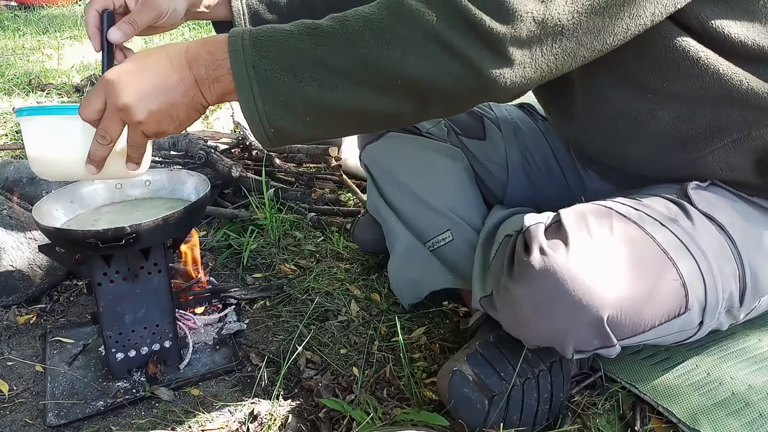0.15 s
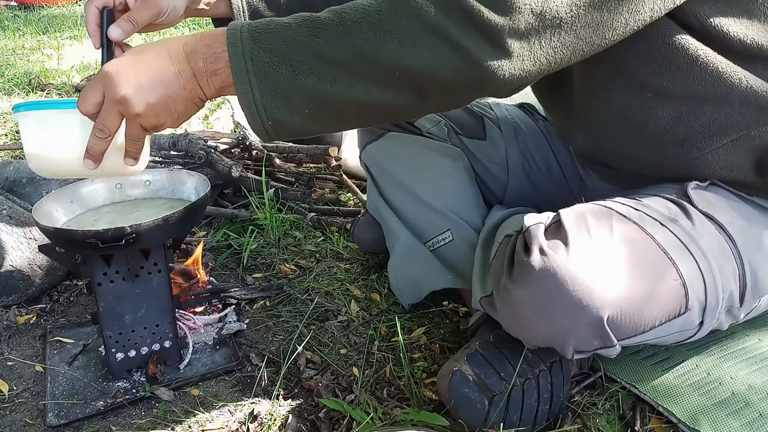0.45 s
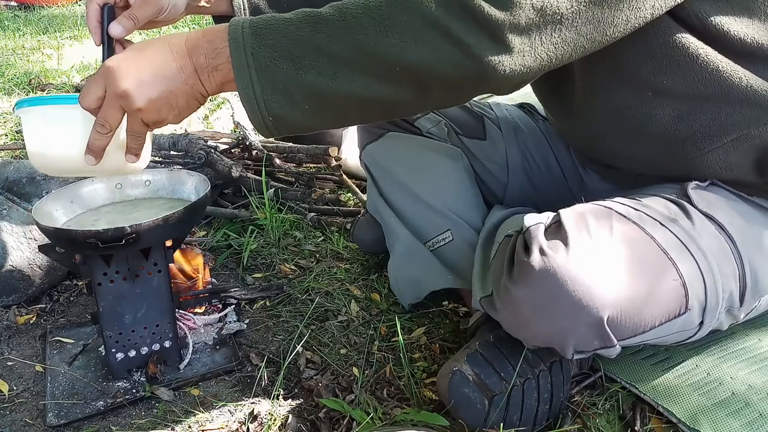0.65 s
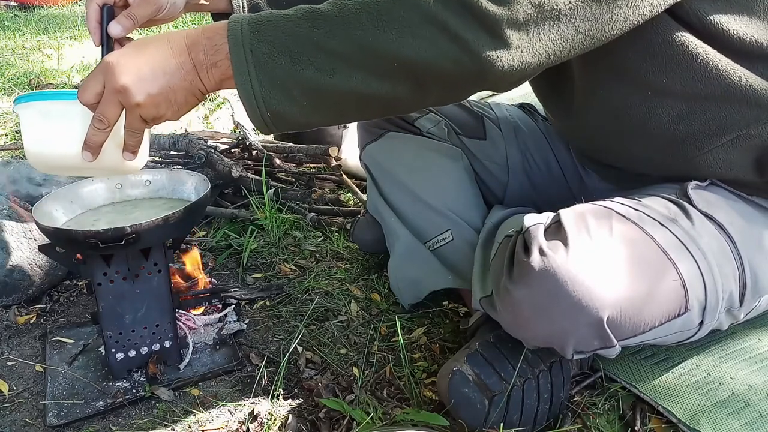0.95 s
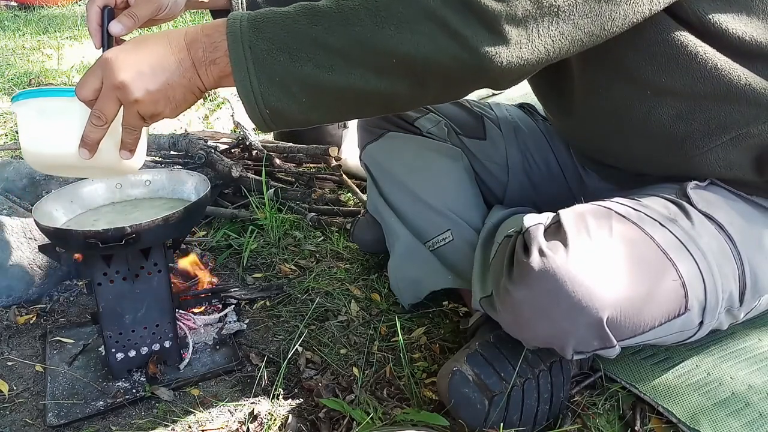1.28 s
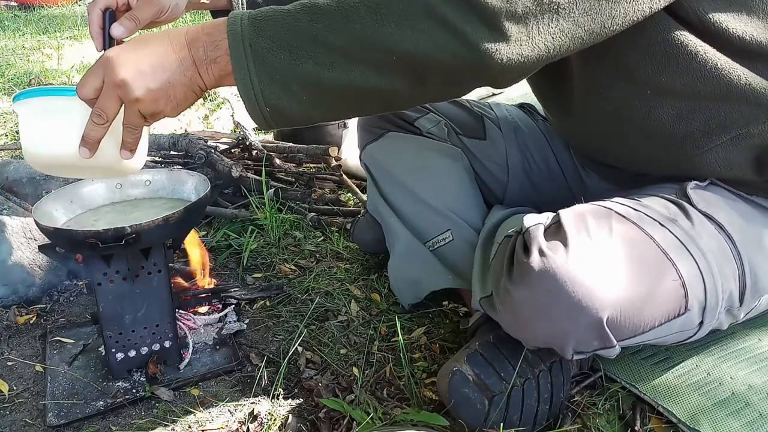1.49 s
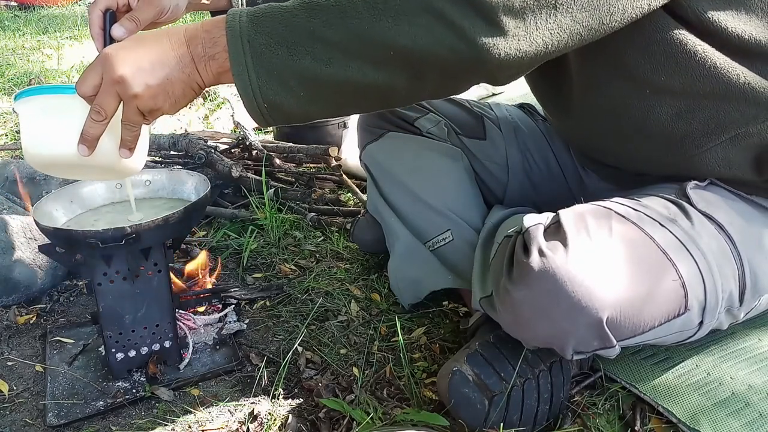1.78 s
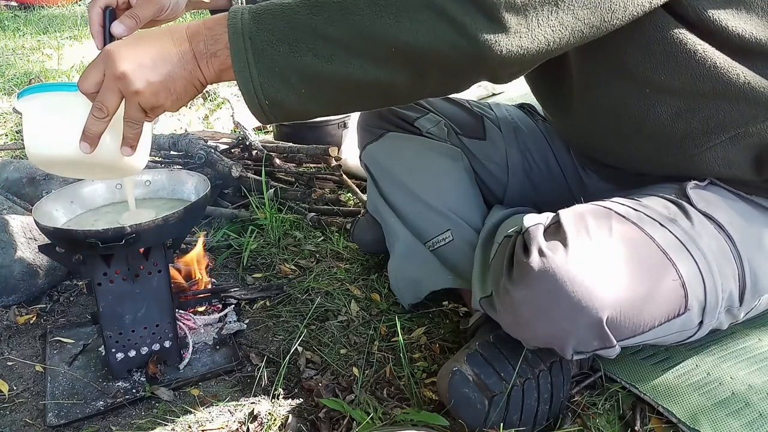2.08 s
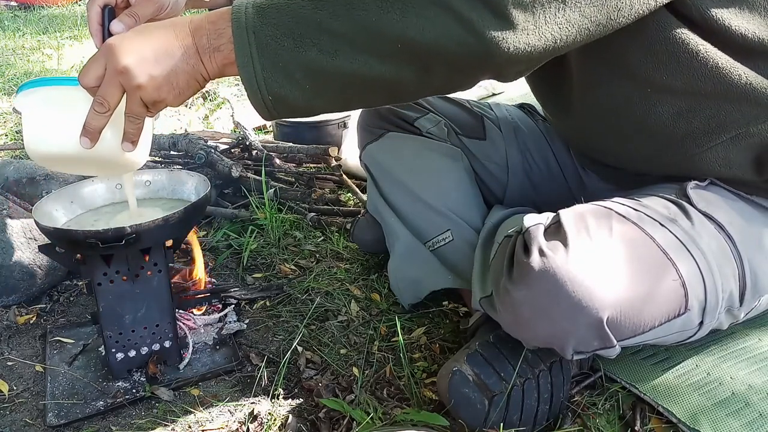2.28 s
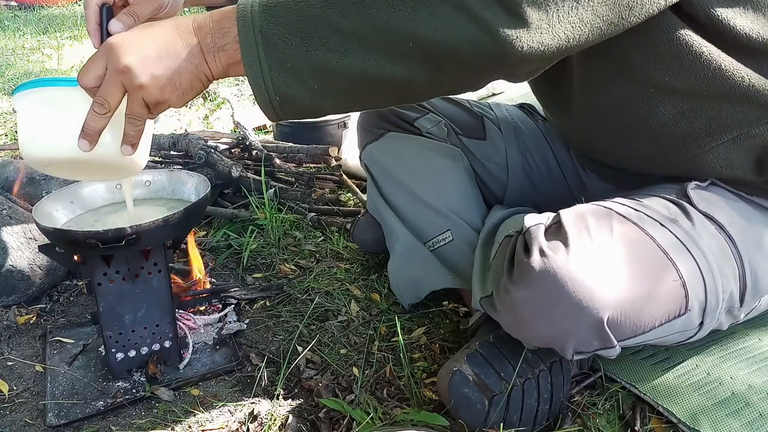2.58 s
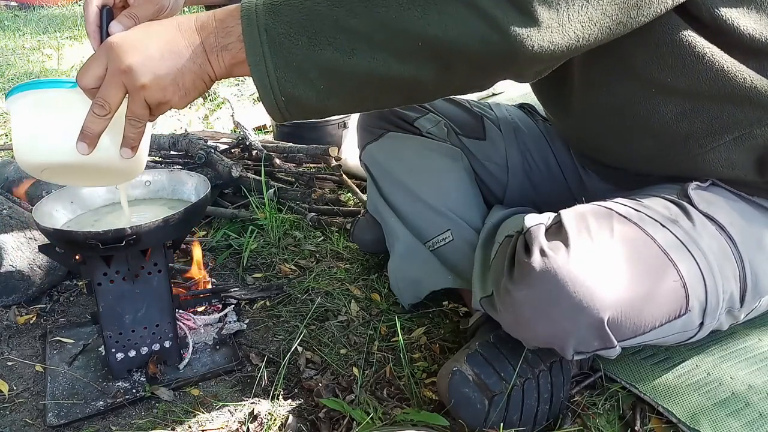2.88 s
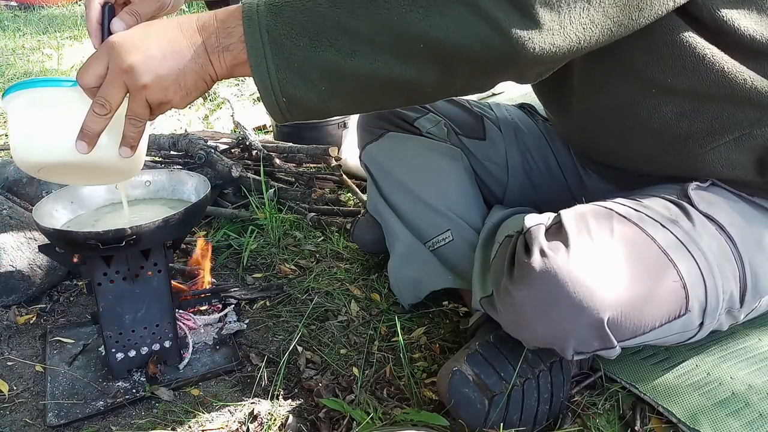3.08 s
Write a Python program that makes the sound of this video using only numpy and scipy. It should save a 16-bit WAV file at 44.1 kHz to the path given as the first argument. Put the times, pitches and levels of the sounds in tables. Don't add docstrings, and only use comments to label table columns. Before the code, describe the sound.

Batter sizzling in a hot pan, outdoors, close and slightly left in stereo. Soft leafy air and a faint low drone open alone. Firewood snaps loudly and brightly at 0.55 s, then duller and softer at 0.69 s, with brief echoes. At 1.82 s a short steam puff starts the frying; dense, steady crackling from 2.0 s drops after 2.9 s into thin sizzle and quick spits until about 3.25 s.

```python
import sys
import numpy as np
from scipy import signal
from scipy.fft import rfft, irfft, next_fast_len
from scipy.io import wavfile
from scipy.ndimage import uniform_filter1d, map_coordinates

SR = 44100
rng = np.random.default_rng(int(sys.argv[2]) if len(sys.argv) > 2 else 0)


def amplitude_ratio(level_db):
    exponent = np.asarray(level_db, float) / 20
    return 10 ** exponent


def wav_record(signal):
    frames = np.transpose(np.atleast_2d(signal))
    bounded = np.clip(frames, -1, 1)
    quanta = np.round(bounded * 32767).astype(np.int16)
    wavfile.write(sys.argv[1], SR, quanta)


N = 143325
TIME = np.arange(N) / SR
LAG_S = .000195
TOP_HZ = 15740


def unit(x):
    return x / np.sqrt(np.mean(x ** 2) + 1e-20)


def along(points, hz):
    f, v = np.transpose(points)
    return np.interp(np.log(hz + 1), np.log(f + 1), v)


def curves(rows):
    s, *cols = np.transpose(rows)
    return [np.interp(TIME, s, c) for c in cols]


def wobble(rate):
    knots = rng.standard_normal(int(N * rate / SR) + 4)
    return map_coordinates(knots, [np.arange(N) * rate / SR])


def blue_noise(count):
    return np.diff(rng.standard_normal(count + 1))


def filtered(x, response):
    m = 2 * next_fast_len(N // 2 + SR // 4)
    return irfft(rfft(x, m) * response(np.fft.rfftfreq(m, 1 / SR)), m)[..., :N]


def causal(db):
    c = irfft(np.log(amplitude_ratio(db)))
    half = c.shape[-1] // 2
    c = np.concatenate([c[..., :1], 2 * c[..., 1:half], 0 * c[..., half:]], axis=-1)
    return np.exp(rfft(c))


def from_left(x, left_db):
    def response(hz):
        left = amplitude_ratio(left_db / 2) + 0j * hz
        right = amplitude_ratio(-left_db / 2) * np.exp(-2j * np.pi * hz * LAG_S)
        return np.array([left, right])
    return filtered(x, response)


def scattered(x, t60):
    t = np.arange(SR // 4) / SR
    tail = rng.standard_normal((2, len(t))) * amplitude_ratio(-60 * t / t60)
    tail = tail / np.linalg.norm(tail, axis=1, keepdims=True)
    return signal.fftconvolve(x, tail, axes=1)[:, :N]


def air():
    # (time [s], level [dB])
    air_levels = [(0, -46.5), (.5, -46), (.7, -47), (.8, -49), (1.1, -51.5), (1.65, -51.5), (1.8, -48.5),
                  (2.1, -47.5), (2.6, -45.5), (2.8, -44.5), (3.25, -46.5)]
    # (frequency [Hz], level [dB per Hz])
    air_spectrum = [(30, -16), (110, -4.5), (230, -2), (550, 0.5), (850, -6), (2200, -9), (4000, -15.5),
                    (16000, -26)]
    # (frequency [Hz], left-right likeness [0-1])
    coherence = [(60, 0.83), (200, 1), (400, 0.75), (700, 0.31), (1400, 0.57), (3000, 0.26), (7000, 0.023)]
    patchy_db, sway_db = 1.15, -0.34
    drone_hz, drone_width_hz, drone_db = 67.8, 10, -16.5
    lag_s = .00046

    spectra = signal.stft(rng.standard_normal((2, N)), nperseg=512)[2]
    patches = rng.standard_normal(spectra.shape[1:])
    patches = uniform_filter1d(uniform_filter1d(patches, size=5, axis=0), size=10, axis=1)
    pair = signal.istft(spectra * amplitude_ratio(patchy_db * unit(patches)), nperseg=512)[1][:, :N]

    def mid_and_side(hz):
        angle = np.arccos(np.clip(along(coherence, hz), -1, 1)) / 2
        return amplitude_ratio(along(air_spectrum, hz)) * [np.cos(angle), np.sin(angle)]

    mid, side = filtered(pair, mid_and_side)
    leaves = unit(np.array([np.roll(mid + side, round(lag_s * SR)), mid - side]))
    drone = filtered(rng.standard_normal(N), lambda hz: np.exp(-((hz - drone_hz) / drone_width_hz) ** 2))
    level_db, = curves(air_levels)
    return amplitude_ratio(level_db + sway_db * wobble(3.75)) * (leaves + amplitude_ratio(drone_db) * unit(drone))


def splinter(dull, crack_db):
    # (frequency [Hz], level [dB], decay time T60 [s])
    modes = [(1210, -19, 0.0056), (1970, -10, 0.0053), (3440, -7, 0.0051), (5160, 1, 0.0033),
             (6530, -6.5, 0.0044), (7550, -5.5, 0.0064), (12600, -9, 0.0071)]
    dull_db_per_oct, rise_s, crack_t60_s = 6, .00011, .014
    t = np.arange(SR // 20) / SR
    ring = 0
    for hz, mode_db, t60 in modes:
        tilt_db = dull * dull_db_per_oct * np.log2(hz / 5000)
        ring = ring + amplitude_ratio(mode_db - tilt_db - 60 * t / t60) * np.sin(2 * np.pi * hz * t)
    crack = amplitude_ratio(crack_db - 60 * t / crack_t60_s) * blue_noise(len(t))
    return (ring + crack) * (1 - np.exp(-t / rise_s))


def snaps():
    # (time [s], peak level [dB], dullness [0-1], crack level [dB])
    snap_events = [
        (.55358, -2.5, .05, -13),
        (.68655, -8, .6, -9),
    ]
    left_db = 2
    ground_s, ground_db = .0056, -19
    bush_db, bush_t60_s, trees_db, trees_t60_s = -7, .035, -11, .2
    front_s = .0002
    out = np.zeros((2, N))
    for s, db, dull, crack_db in snap_events:
        sound = splinter(dull, crack_db)
        snap = np.zeros(N)
        snap[round(s * SR):][:len(sound)] = amplitude_ratio(db) * sound
        direct = from_left(snap, left_db)
        out += direct + amplitude_ratio(ground_db) * np.roll(direct, round(ground_s * SR), axis=1)
        front = snap[None] * np.exp(-np.clip(TIME - s, 0, 1) / front_s)
        bushes = amplitude_ratio(bush_db) * scattered(front, bush_t60_s)
        trees = amplitude_ratio(trees_db) * scattered(front, trees_t60_s)
        out += filtered(bushes + trees, lambda hz: hz < TOP_HZ)
    return out


def first_drop():
    # (frequency [Hz], level [dB])
    steam_spectrum = [(600, -24), (1500, -12), (2500, 5), (4000, -2), (7000, 1), (9000, -22), (16000, -24)]
    start_s, rise_s, length_s = 1.8185, 0.0025, 0.021
    peak_db, fade_db_per_s = -39.5, 203
    since = np.clip(TIME - start_s, 0, 1)
    gate = np.minimum(since / rise_s, 1) * (since < length_s)
    steam = unit(filtered(rng.standard_normal(N), lambda hz: amplitude_ratio(along(steam_spectrum, hz))))
    return gate * amplitude_ratio(peak_db - fade_db_per_s * since + 1.2 * wobble(300)) * steam


def single_spits():
    # (time [s], peak level [dB])
    spit_events = [(1.895, -41), (2.109, -29), (3.018, -29), (3.085, -37), (3.109, -35), (3.127, -38),
                   (3.139, -38), (3.149, -28), (3.17, -32), (3.18, -27), (3.199, -30), (3.206, -27),
                   (3.241, -39)]
    decay_s, offset_db = .004, -4
    envelope = 0
    for s, db in spit_events:
        envelope = envelope + amplitude_ratio(db + offset_db - 20 * np.clip(TIME - s, 0, 1) / decay_s) * (TIME >= s)
    return envelope * blue_noise(N)


def pops(density, count=32000):
    # (time [s], change of lag [s])
    lag_drift = [(0, 0), (2.7, 0), (2.95, -.00004), (3.25, -.00005)]
    pop_hz, spread_oct, cycles, size_db = 5520, 1.134, 1, 2
    lag_scatter_s = .00002
    u, z = rng.random((count, 2)), rng.standard_normal((count, 2))
    total = np.cumsum(density) / SR
    k = np.arange(count) + u[:, 0]
    start = np.interp(k, total, np.arange(N))
    hz = np.clip(pop_hz * 2 ** (spread_oct * z[:, 0]), 600, 17000)[:, None]
    size = amplitude_ratio(-size_db * np.log(u[:, 1] + 0.00077)) * (k < total[-1])
    size = size * np.sqrt(hz[:, 0] / pop_hz)
    right_lag = LAG_S + np.interp(start / SR, *np.transpose(lag_drift)) + lag_scatter_s * z[:, 1]
    out = []
    for lag in (0, right_lag):
        at = start + lag * SR
        i = np.ceil(at).astype(int)[:, None] + np.arange(64)
        t = (i - at[:, None]) / SR
        burst = size[:, None] * np.sin(2 * np.pi * hz * t) * np.exp(-hz * t / cycles)
        out.append(np.bincount(i.ravel(), burst.ravel(), N + SR)[:N])
    return np.array(out) / np.sqrt(density + 1)


def bubbling_fat():
    # (time [s], level [dB], pop rate [thousands per s], large bubbles [dB])
    fry_course = [(1.817, -66, 20.6, 0), (1.822, -30.5, 18.4, -9), (1.86, -47, 19.1, 5.5),
                  (1.92, -42, 19.3, 0), (2.0, -35.5, 25, 1), (2.1, -36, 25.4, 0), (2.4, -36, 25, -1),
                  (2.52, -37.5, 22, -3.5), (2.8, -36.5, 21.4, -6), (2.9, -42, 16, -12),
                  (2.925, -37, 15.8, -6), (2.95, -40.5, 11.9, -7), (3.04, -46, 7.6, 0),
                  (3.25, -49, 6.2, -3)]
    # (frequency [Hz], level [dB])
    fry_spectrum = [(150, -33.5), (500, -1.5), (950, 0.5), (2000, 0.5), (4000, 0), (7000, 3), (11000, 8.5),
                    (16000, 17)]
    clump_db, swell_db, large_below_hz = 1.2, .3, 2200
    level_db, thousands, large_db = curves(fry_course)
    on = TIME >= fry_course[0][0]
    crackle = pops(on * np.clip(thousands, .3, 30) * 1000)
    crackle = crackle / np.std(crackle[:, on])
    crackle = filtered(crackle, lambda hz: causal(along(fry_spectrum, hz)))
    large = filtered(crackle, lambda hz: 1 / (1 + (hz / large_below_hz) ** 4))
    envelope = on * amplitude_ratio(level_db + swell_db * wobble(9.8) + clump_db * wobble(82))
    return envelope * (crackle + (amplitude_ratio(large_db) - 1) * large)


def frying():
    # (frequency [Hz], width [Hz], gain over the rest [dB])
    color_peaks = [(990, 310, 5.5), (1604, 130, 5.5), (2240, 130, 3), (2900, 110, 5.5), (3620, 38, 9),
                   (4400, 140, 3), (5650, 92, 1.5), (7530, 150, 3), (9800, 150, 1)]
    left_db, scatter_db, scatter_t60_s = 3, -5, .02
    direct = bubbling_fat() + from_left(first_drop() + single_spits(), left_db=6.5)
    turn = np.arange(N) // 2048 % 4
    echoes = sum(scattered(direct * (turn == k), scatter_t60_s) for k in range(4))

    def pan(hz):
        ring_db = sum(db / (1 + (2 * (hz - c) / w) ** 2) for c, w, db in color_peaks)
        return causal(ring_db - 3)

    return filtered(direct + amplitude_ratio(scatter_db) * echoes, pan) * amplitude_ratio([[left_db / 2], [-left_db / 2]])


def scene():
    steady = filtered(air() + frying(), lambda hz: hz < TOP_HZ)
    return steady + filtered(snaps(), lambda hz: 1 / (1 + (hz / 16100) ** 80))


def band_limit(x):
    return signal.sosfilt(signal.butter(12, 17000, fs=SR, output="sos"), x)


def record(dry):
    # (frequency [Hz], gain [dB])
    left_response = [(20, -1), (6000, 2.5), (7600, 1.5), (7950, -7), (9000, -6), (13000, -7), (16000, -15)]
    right_response = [(20, -1), (6000, 1), (7300, 2), (7800, -1), (9500, -8.5), (12600, -7), (16000, -10)]

    def microphones(hz):
        return causal(np.array([along(left_response, hz), along(right_response, hz)]))

    mix = filtered(dry, microphones)
    return band_limit(mix)


dry = scene()
out = record(dry)
wav_record(out)
```